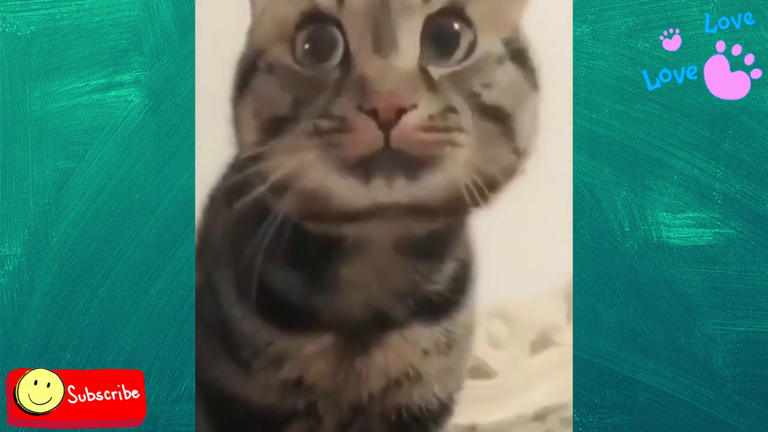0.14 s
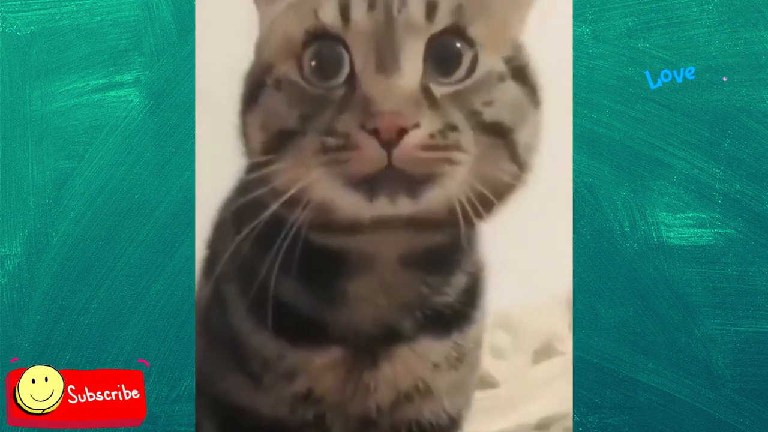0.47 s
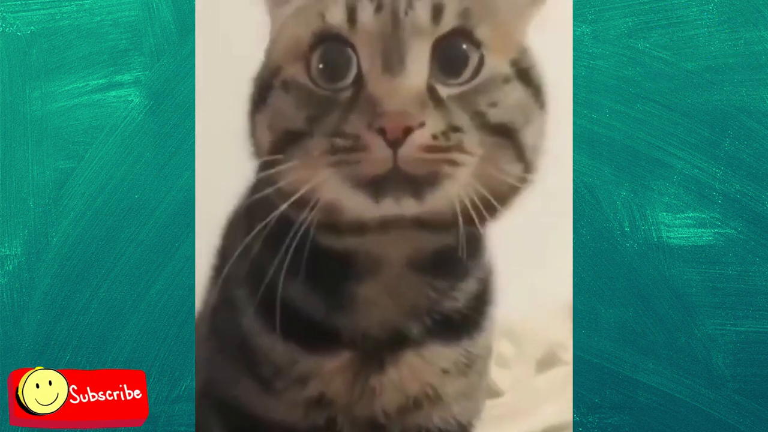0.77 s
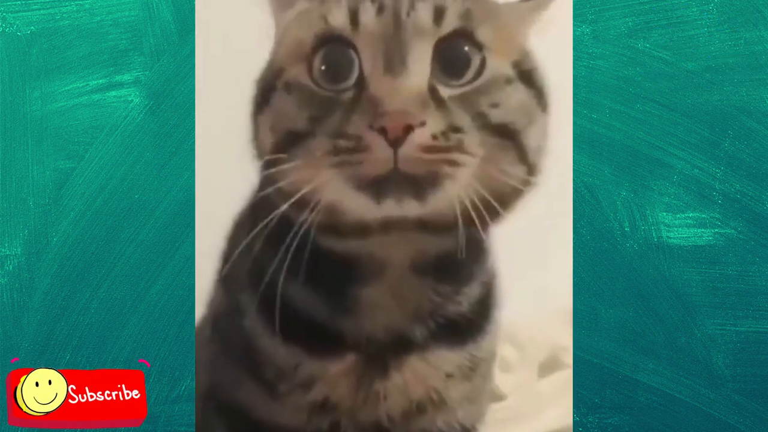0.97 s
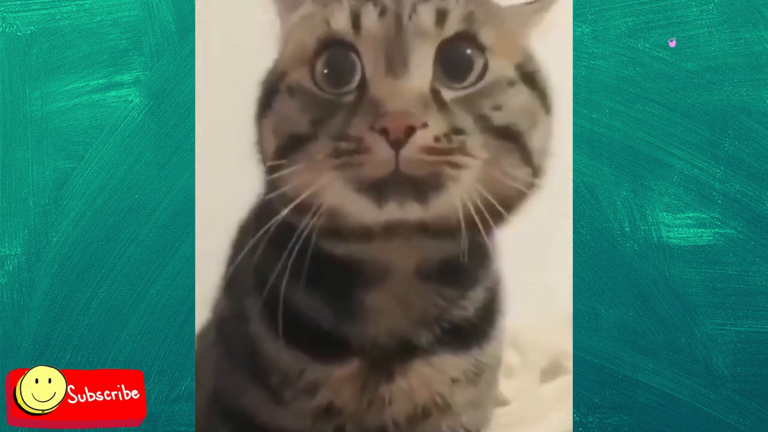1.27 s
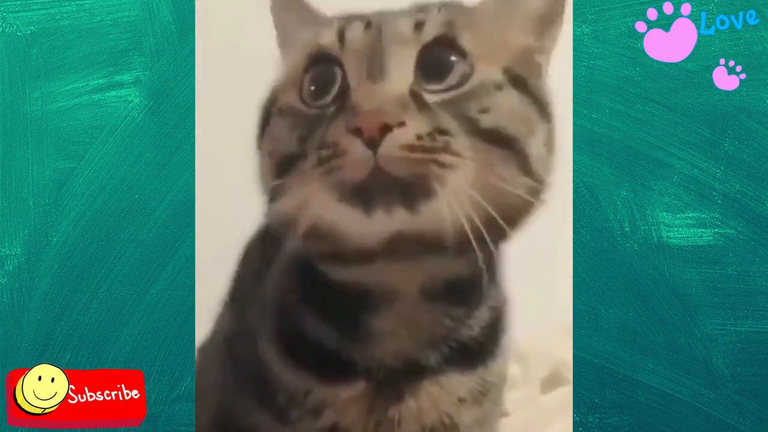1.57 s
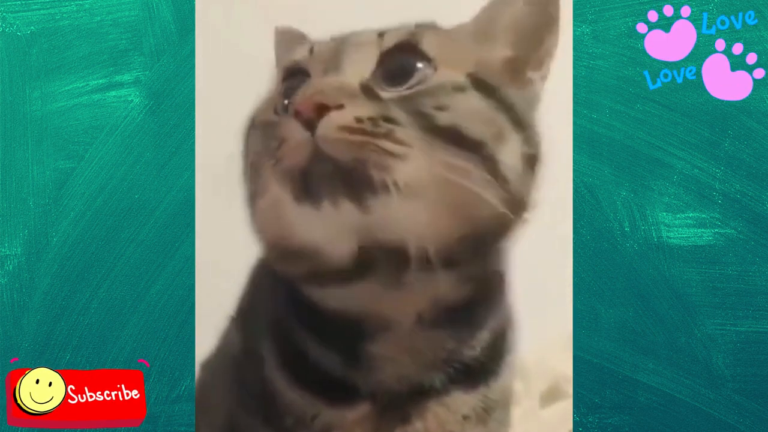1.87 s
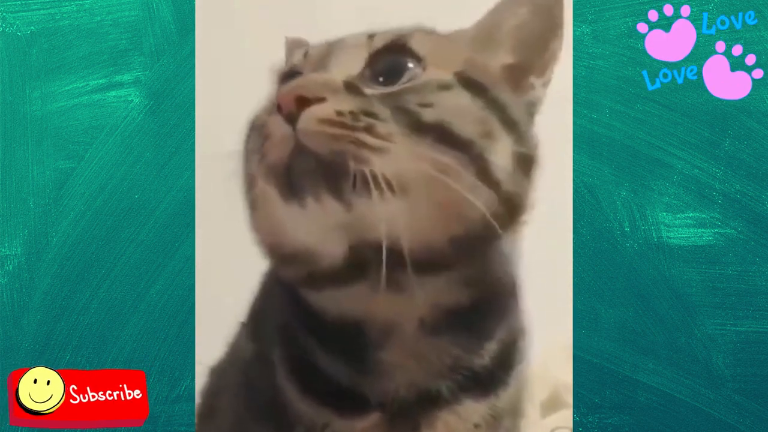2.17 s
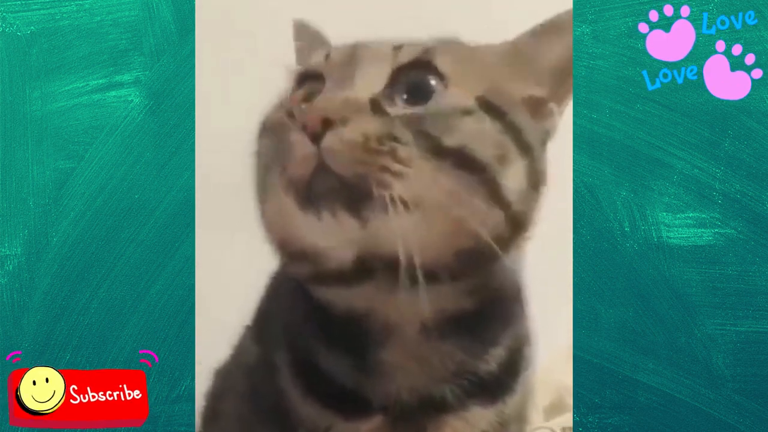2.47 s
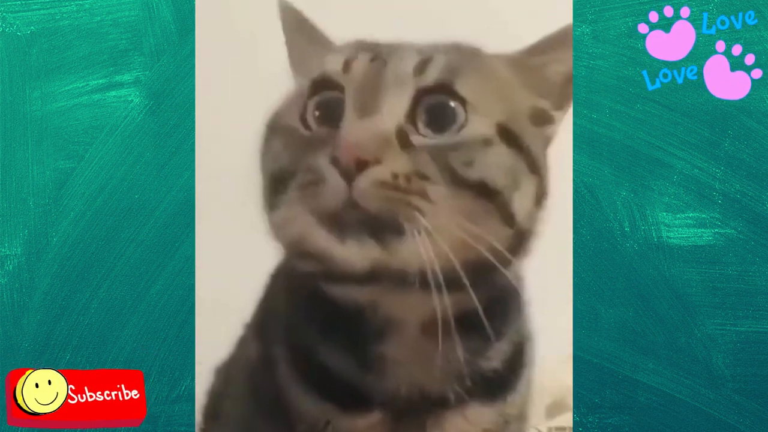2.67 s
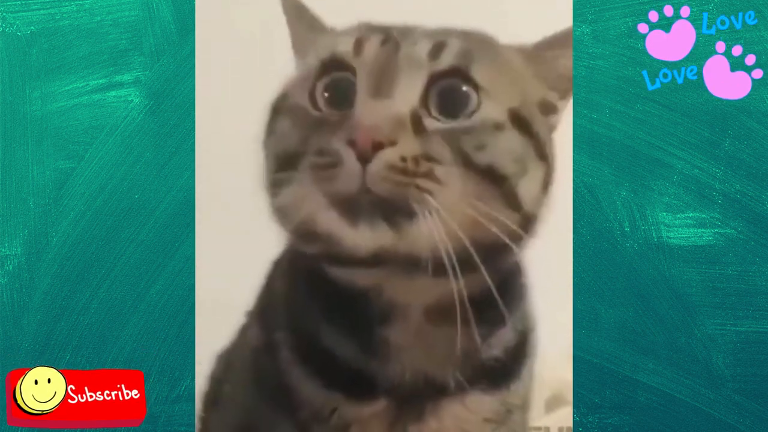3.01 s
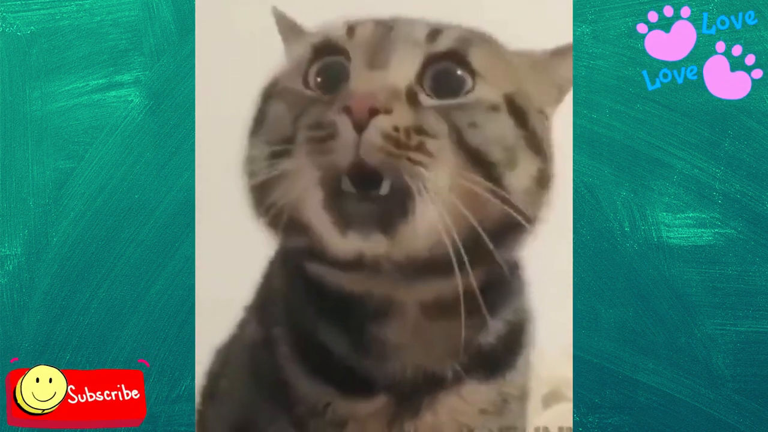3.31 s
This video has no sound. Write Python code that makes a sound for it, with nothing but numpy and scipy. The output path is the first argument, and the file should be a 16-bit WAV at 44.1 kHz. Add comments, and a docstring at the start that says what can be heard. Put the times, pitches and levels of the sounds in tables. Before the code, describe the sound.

A cat gives one long yowl, close to the microphone in a small room. After a soft breath, a low moan rises from 0.2 seconds and breaks at 0.4 into a loud, clear, slightly distorted tone. It sinks and softens, turning hoarse and wheezy from about 1.5 seconds, swells again near 2.7 and ends in a breath around 3.3. A faint house rumble lies underneath.

```python
"""A cat gives one long yowl, close to the microphone in a small room. Its voice starts as a low moan,
breaks upward into a loud, nearly pure tone that overloads the microphone, then sinks, turns hoarse
and swells again. Air rasps and wheezes in its throat, rushes through its open mouth before and
after the call, and hisses once from its nose. A faint house rumble lies underneath."""
import sys
import numpy as np
from scipy import signal
from scipy.fft import rfft, irfft, next_fast_len
from scipy.io import wavfile
from scipy.ndimage import uniform_filter1d, map_coordinates

SR = 44100
rng = np.random.default_rng(int(sys.argv[2]) if len(sys.argv) > 2 else 0)


def pcm_store(signal):
    """Save signal as 16-bit PCM."""
    levels = np.round(np.clip(np.atleast_2d(signal), -1, 1) * 32767)
    wavfile.write(sys.argv[1], SR, levels.astype(np.int16).T)


N = 152145
T = np.arange(N) / SR
BREAK_S = .382  # the moan breaks into the high voice

# The melody of the high voice. Each row: time in seconds, pitch in Hz, level in dB.
YOWL_MELODY = [(0.39, 359.8, -4), (0.41, 383.7, -4.3), (0.44, 414.2, -5.5), (0.51, 433.6, -5),
               (0.64, 429.2, -4), (0.662, 427.9, -8), (0.79, 417.8, -11), (0.89, 410.9, -9.5),
               (0.94, 403.4, -13), (1.06, 388.8, -12), (1.15, 379.3, -16.5), (1.27, 366, -16.5),
               (1.52, 344.8, -21.5), (1.98, 328.6, -21.5), (2.14, 322.5, -16.5), (2.29, 327, -15.5),
               (2.71, 337.4, -10.5), (3.03, 320.6, -15.5), (3.23, 308.9, -23), (3.29, 305.4, -30.5)]


def amp(db):
    """Decibels to gain."""
    return 10 ** (np.asarray(db) / 20)


def unit(x):
    """Scale to rms 1."""
    return x / np.sqrt(np.mean(x ** 2) + 1e-20)


def along(points, hz):
    """Read (Hz, value) points on a log frequency axis."""
    freqs, values = np.transpose(points)
    return np.interp(np.log(hz + 1), np.log(freqs + 1), values)


def curves(rows):
    """One automation curve for each column after the time."""
    times, *columns = np.transpose(rows)
    return [np.interp(T, times, column) for column in columns]


def ramp(start_s, length_s):
    """A smooth fade from 0 to 1."""
    return np.sin(np.pi / 2 * np.clip((T - start_s) / length_s, 0, 1)) ** 2


def wobble(rate):
    """A smooth random curve with rate knots a second."""
    return map_coordinates(rng.standard_normal(N // 8), [T * rate + 2], mode="wrap")


def filtered(x, response):
    """Equalise x with a gain given as a function of frequency."""
    size = next_fast_len(N + 8192)
    return irfft(rfft(x, size) * response(np.fft.rfftfreq(size, 1 / SR)), size)[:N]


def noise(spectrum):
    """Noise of rms 1, coloured by (Hz, dB) points."""
    return unit(filtered(rng.standard_normal(N), lambda hz: amp(along(spectrum, hz))))


def patchy(x, depth_db):
    """Make narrow bands of x flare and fade at random; the result has rms 1."""
    bands = signal.stft(x, nperseg=1024)[2]
    flare = uniform_filter1d(rng.standard_normal(bands.shape), size=3, axis=0)
    flare = uniform_filter1d(flare, size=6, axis=1)
    return unit(signal.istft(bands * amp(depth_db * unit(flare)))[1][:N])


def cycles(hz):
    """Running phase of a pitch curve, in radians."""
    return 2 * np.pi * np.cumsum(hz) / SR


def partial(phase, db):
    """One partial at an rms level."""
    return np.sqrt(2) * amp(db) * np.cos(phase)


def opening_breath():
    """Air flows through the open mouth before the voice starts."""
    # The colour of the breath. Each row: frequency in Hz, gain in dB.
    mouth_colour = [(700, -20), (1050, 9.5), (1300, -9), (1600, -11.5), (2090, 3.5), (2350, -5.5),
                    (2900, -6.5), (3200, 0), (3550, -33), (5300, -22), (9500, -41)]
    return (1 - ramp(.17, .066)) * amp(-38 + wobble(60)) * noise(mouth_colour)


def throat_air(phase, tension):
    """Turbulence in nose and throat pulses with the voice; the rasp shifts as the throat slackens."""
    # The airflow. Each row: time in seconds, then nasal, rasp and hiss levels in dB.
    air_levels = [(0, -62.5, -50, -77), (.27, -51.5, -55.5, -57.5), (.36, -39, -40, -46),
                  (.397, -38, -32.5, -52.5), (.43, -45, -37.5, -54), (.8, -48, -44, -57),
                  (.95, -51.5, -47.5, -58), (1.1, -51, -59, -61), (1.27, -51.5, -67.5, -60.5),
                  (1.35, -47.5, -48, -63.5), (1.6, -44.5, -46.5, -69), (1.87, -39.5, -39.5, -65),
                  (2.15, -39, -41.5, -63.5), (2.45, -41, -43, -55), (2.7, -44.5, -46, -50.5),
                  (3.0, -57.5, -54, -55.5), (3.27, -55.5, -66.5, -61), (3.32, -67, -56, -82)]
    # The colours of the nasal band near 1 kHz, the tense and slack rasp, and the treble hiss.
    # Each row: frequency in Hz, gain in dB.
    nasal_colour = [(300, -23.5), (560, -12), (700, -8.5), (820, 1), (980, 2), (1120, -18), (1500, -48.5)]
    tense_colour = [(700, -19), (1250, -11), (1480, 9.5), (1800, -14), (2050, -1), (2550, -8), (2900, -0.5),
                    (3120, -10), (3400, -32), (5400, -21), (13000, -42.5)]
    slack_colour = [(700, -29), (1170, -13), (1350, -1), (1800, -1), (1980, -4.5), (2300, 1), (2850, -4.5),
                    (3200, -15), (3450, -25.5), (5400, -28.5), (13000, -46)]
    hiss_colour = [(3500, -15), (5500, -10), (6200, -15.5), (6900, 7.5), (7400, -23.5), (7950, 2),
                   (8450, 3.5), (9400, -20), (13500, -15.5)]
    nasal_db, rasp_db, hiss_db = curves(air_levels)
    nasal = patchy(noise(nasal_colour), depth_db=4.5) * amp(nasal_db + 2 * wobble(60))
    throat = np.sqrt(tension) * noise(tense_colour) + np.sqrt(1 - tension) * noise(slack_colour)
    rasp = patchy(throat, depth_db=5) * amp(rasp_db + 2 * wobble(60))
    hiss = patchy(noise(hiss_colour), depth_db=2.5) * amp(hiss_db + 1.2 * wobble(82))
    pulsing = lambda depth: unit(1 + depth * np.cos(phase))
    return (nasal + rasp) * pulsing(depth=.19) + hiss * pulsing(depth=.2)


def house_rumble():
    """A faint low bed from the house that swells twice near the end."""
    # The colour of the rumble. Each row: frequency in Hz, gain in dB.
    rumble_colour = [(20, -24.5), (48, 5.5), (90, -21), (600, -36.5), (3000, -61)]
    # Its swells. Each row: time in seconds, level in dB.
    swells = [(0, -53), (1, -59.5), (1.9, -55.5), (2.55, -54), (2.8, -40), (3.15, -54), (3.4, -41)]
    return noise(rumble_colour) * amp(curves(swells)[0])


def wheezes():
    """The narrowed throat gives thin, unsteady whistles, each with two overtones."""
    # The whistles. Each row: start and length in seconds, first and last pitch in Hz, level in dB,
    # octave against the fundamental in dB.
    whistles = [(.005, 0.094, 950, 1004, -36.5, -20), (0.064, 0.15, 1045, 1034, -39, -1),
                (0.3, 0.12, 1478, 1470, -33.5, -1), (1.628, 0.18, 1450, 1440, -39.5, -1),
                (1.793, 0.14, 1465, 1455, -43.5, 3.5), (1.907, 0.22, 1412, 1385, -43.5, 3),
                (2.18, 0.42, 2310, 2270, -48.5, -42), (2.875, 0.4, 1850, 1793, -51.5, -28)]
    jitter, fade_s = .011, .03
    out = np.zeros(N)
    for start, length, first_hz, last_hz, db, octave_db in whistles:
        hz = np.interp(T, [start, start + length], [first_hz, last_hz])
        phase = cycles(hz * (1 + jitter * wobble(400)))
        gate = ramp(start, fade_s) * (1 - ramp(start + length - fade_s, fade_s))
        tone = partial(phase, 0) + partial(2 * phase, octave_db) + partial(3 * phase, octave_db - 24.5)
        out += tone * gate * amp(db + 3.53 * wobble(120))
    return out


def moan():
    """The low voice catches, then glides up through the throat's resonances until it breaks."""
    # The upward glide. Each row: time in seconds, pitch in Hz.
    glide = [(.2, 150.2), (.275, 193.1), (.32, 215.2), (.39, 247.7)]
    # The voice before the throat colours it. Each row: time in seconds, level of the lowest two
    # partials in dB, level of the higher ones in dB.
    drive = [(.195, -62, -63.5), (.207, -30.5, -43), (.258, -19, -33.5), (.3, -19.5, -34),
             (.345, -15.5, -25), (.385, -15.5, -29)]
    # The throat's resonances. Each row: frequency in Hz, gain in dB.
    throat = [(150, -3), (230, 1), (340, 6), (480, -1.5), (560, -2), (800, -5), (970, 1.5), (1150, -0.5),
              (1290, -14), (1480, -16.5), (1700, -26), (2050, -3), (2350, -13.5), (2650, -10), (2950, -20),
              (3650, -58.5), (6200, -30.5), (7300, -45), (8700, -29.5), (9400, -51.5)]
    hz, = curves(glide)
    low_db, upper_db = curves(drive)
    start_s, catch_s, settle_s = drive[0][0], drive[1][0], .012
    jitter = .003 + .19 * np.exp(-np.maximum(T - catch_s, 0) / settle_s)
    phase = cycles(hz * (1 + jitter * wobble(260)))
    voice = sum(partial(k * phase - np.pi / 2, low_db + along(throat, k * hz)) for k in (1, 2))
    for k in range(3, 41):
        offset = 2 * np.pi * rng.random()
        voice += partial(k * phase + offset, upper_db + along(throat, k * hz) + 2 * wobble(90))
    gate = (T > start_s) * (1 - ramp(BREAK_S, .016))
    return voice * amp(.69 * wobble(200)) * gate


def yowl(hz, phase, tension):
    """The high voice: a strong fundamental, two clear overtones and faint ones shaped by the throat."""
    # The overtones against the fundamental. Each row: time in seconds, second partial in dB,
    # third in dB, higher ones in dB before the throat colours them.
    overtones = [(.4, -22, -15, -41), (.5, -15, -24, -23.5), (.68, -13.5, -25, -29.5),
                 (.86, -14.5, -27, -35.5), (1.25, -17, -36, -42.5), (1.6, -17.5, -26.5, -30.5),
                 (2.1, -17.5, -17.5, -29.5), (2.7, -15, -21, -43), (3.0, -16.5, -18, -38),
                 (3.26, -22.5, -7, -49), (3.3, -18, -16, -42)]
    # The resonances of the tense and the slack throat. Each row: frequency in Hz, gain in dB.
    tense_throat = [(1500, -14), (1700, -8.5), (1900, -8.5), (2180, 5), (2340, -11.5), (2520, -4.5),
                    (2800, -3), (3000, -11), (3300, -38.5), (3850, -32), (5100, -40), (5450, -12.5),
                    (5750, -42)]
    slack_throat = [(1300, -5), (1650, -2), (1980, -7.5), (2280, 1), (2650, -2), (3000, -17.5),
                    (3400, -33.5), (5000, -48.5)]
    level_db = curves(YOWL_MELODY)[1] + .65 * wobble(22)
    second_db, third_db, upper_db = curves(overtones)
    voice = partial(phase, 0)
    voice += partial(2 * phase + np.pi / 2, second_db) + partial(3 * phase + np.pi / 2, third_db)
    for k in range(4, 14):
        throat_db = tension * along(tense_throat, k * hz) + (1 - tension) * along(slack_throat, k * hz)
        voice += partial(k * phase + np.pi / 2, upper_db + throat_db + wobble(30))
    gate = ramp(BREAK_S, .016) * (1 - ramp(3.272, .05))
    return voice * amp(level_db) * gate


def sniff():
    """A short hiss of air from the nose in mid-call."""
    # The colour of the sniff. Each row: frequency in Hz, gain in dB.
    nose_colour = [(1500, -18.5), (3500, 6.5), (4700, 2.5), (6000, -5), (8500, -7.5), (13500, -15)]
    start_s, rise_s, fall_db_per_s = 1.272, .028, 114
    level_db = -48 - fall_db_per_s * np.maximum(T - start_s - rise_s, 0)
    return ramp(start_s, rise_s) * amp(level_db) * noise(nose_colour)


def closing_breath():
    """The mouth gapes and air rushes through as the voice ends."""
    # The resonances of the gaping mouth. Each row: frequency in Hz, gain in dB.
    gape_colour = [(450, -36.5), (700, 7), (1050, -27), (1490, 1), (1700, -39), (2080, 12), (2400, -13.5),
                   (2750, 5.5), (3400, -27.5), (12000, -41)]
    return ramp(3.27, .07) * amp(-43.5 + wobble(40)) * noise(gape_colour)


def room(x, t60_s=.4, level_db=-21):
    """The short, faint reverb tail of a furnished room."""
    t = T[:SR // 2]
    tail = rng.standard_normal(len(t)) * amp(-60 * t / t60_s)
    return amp(level_db) * signal.fftconvolve(x, tail / np.linalg.norm(tail))[:N]


def scene():
    """The cat in its room over the rumble; its throat tightens and steadies as the pitch climbs."""
    slack_hz, tense_hz, tighten_s = 360, 405, .088
    pitch = uniform_filter1d(curves(YOWL_MELODY)[0], size=700)
    tension = np.clip((pitch - slack_hz) / (tense_hz - slack_hz), 0, 1) * ramp(BREAK_S, tighten_s)
    waver, jitter = .002, .003 - .0015 * tension  # fractions of the pitch
    hz = pitch * (1 + waver * wobble(20) + jitter * wobble(300))
    phase = cycles(hz)
    cat = moan() + yowl(hz, phase, tension) + throat_air(phase, tension) + wheezes()
    cat += opening_breath() + closing_breath() + sniff()
    rumble = house_rumble()
    return (cat + room(cat) + rumble)[None]


def record(dry):
    """The loudest peaks are flattened, and a faint fizz rides on them; the top end is cut."""
    ceiling, hardness, top_hz = .59, 41, 14000
    clipped = dry[0] / (1 + np.abs(dry[0] / ceiling) ** hardness) ** (1 / hardness)
    excess = uniform_filter1d(np.abs(dry[0] - clipped), size=200)
    fizz = amp(-27.5) * excess * rng.standard_normal(N)
    return filtered(clipped + fizz, lambda hz: hz < top_hz)[None]


dry = scene()
out = record(dry)
pcm_store(out)
```